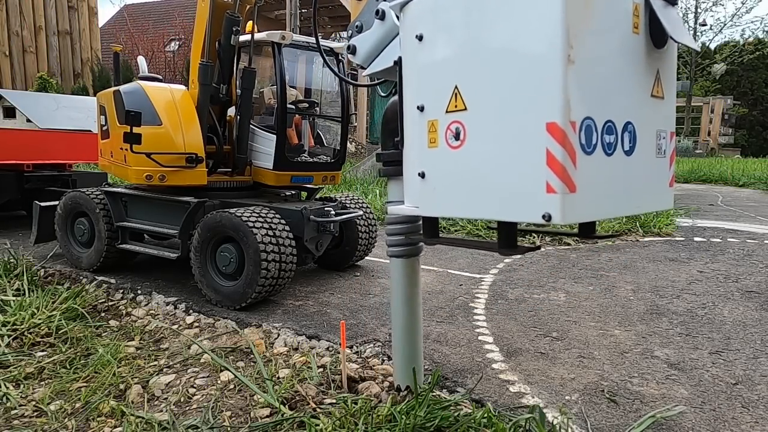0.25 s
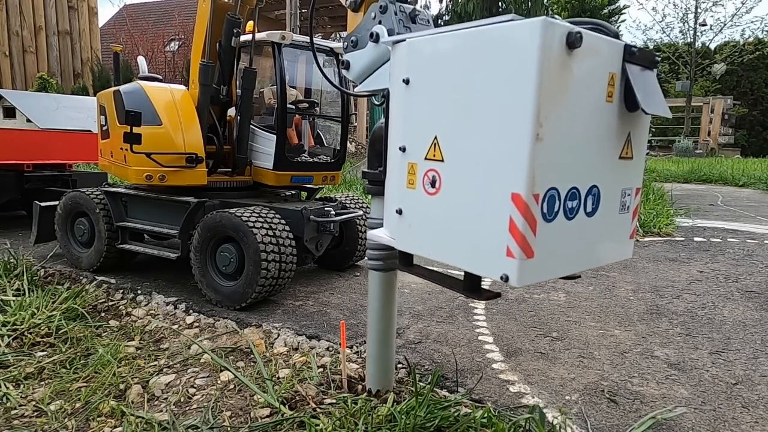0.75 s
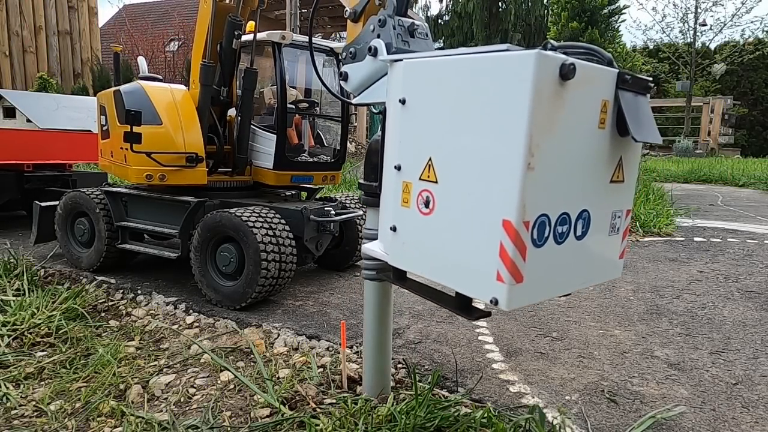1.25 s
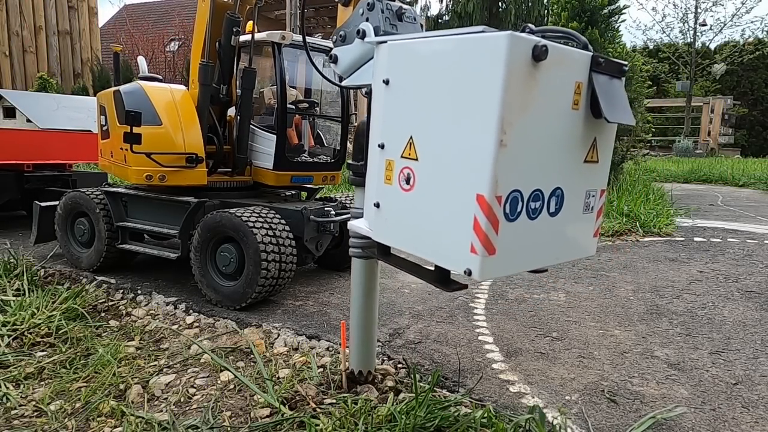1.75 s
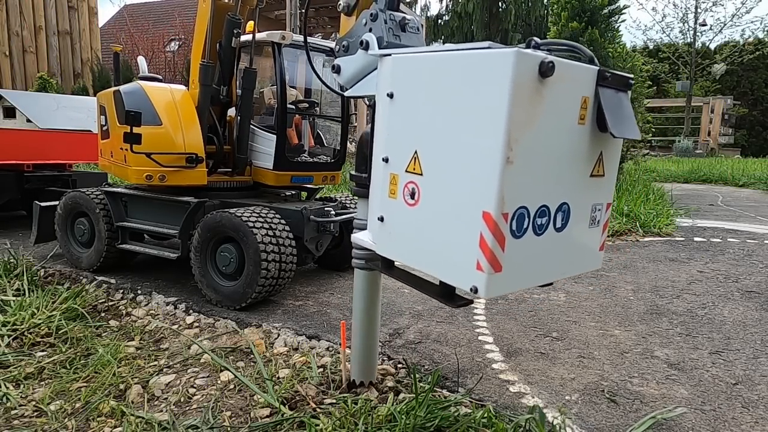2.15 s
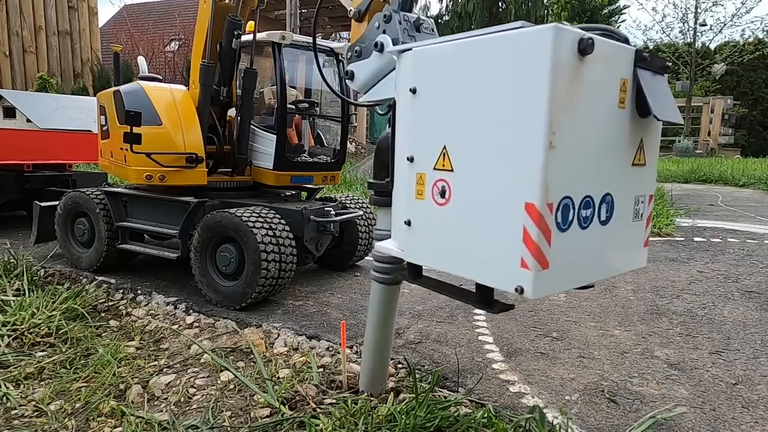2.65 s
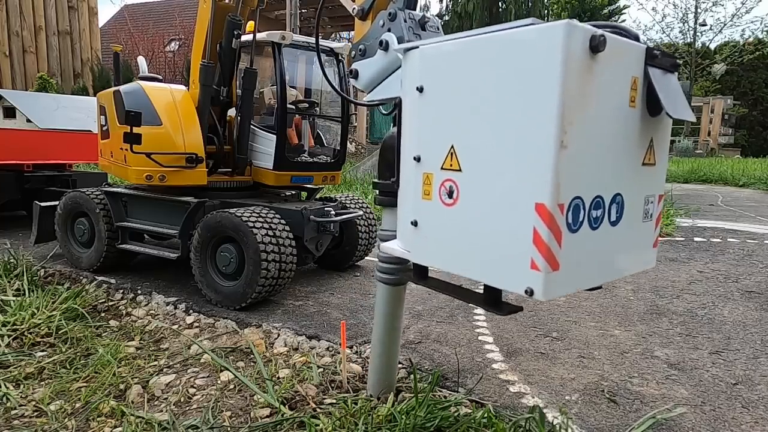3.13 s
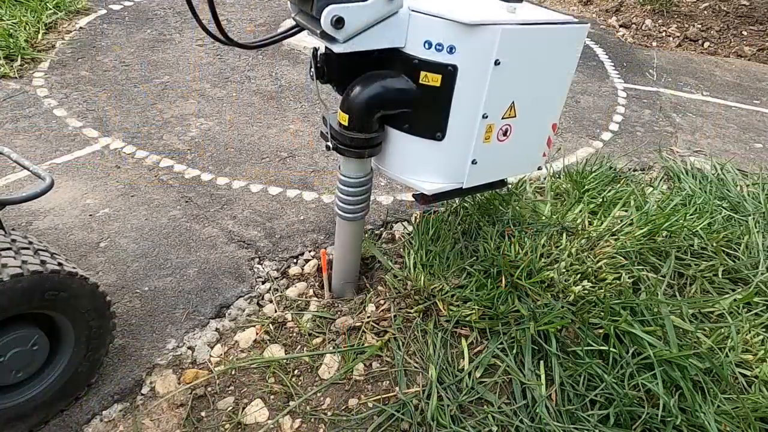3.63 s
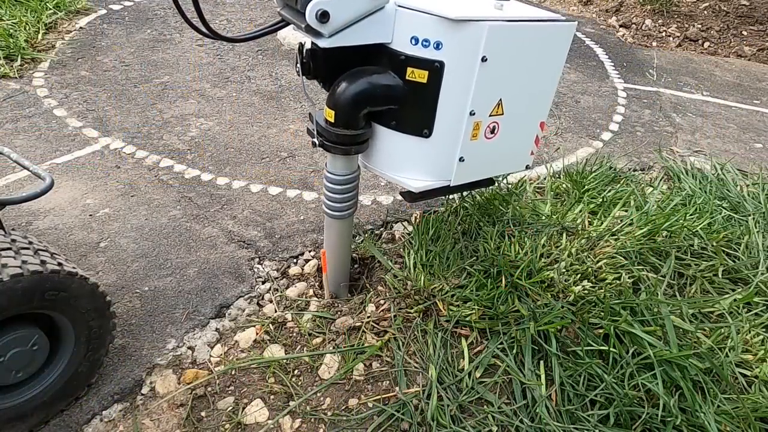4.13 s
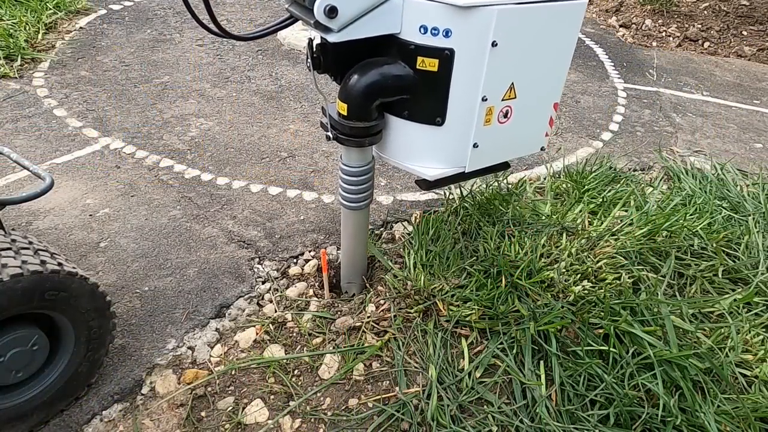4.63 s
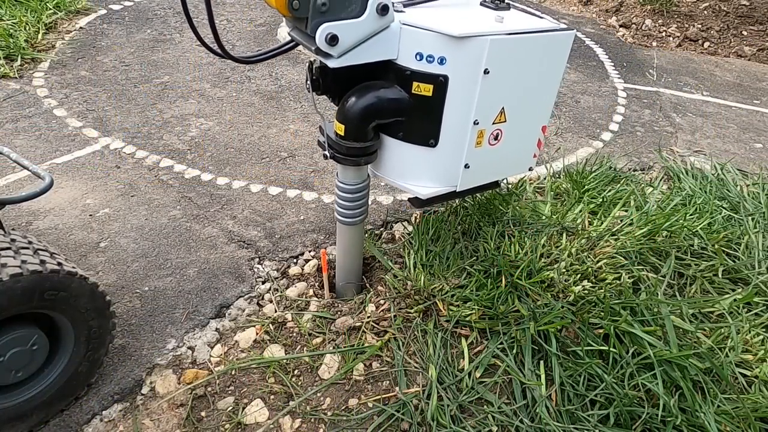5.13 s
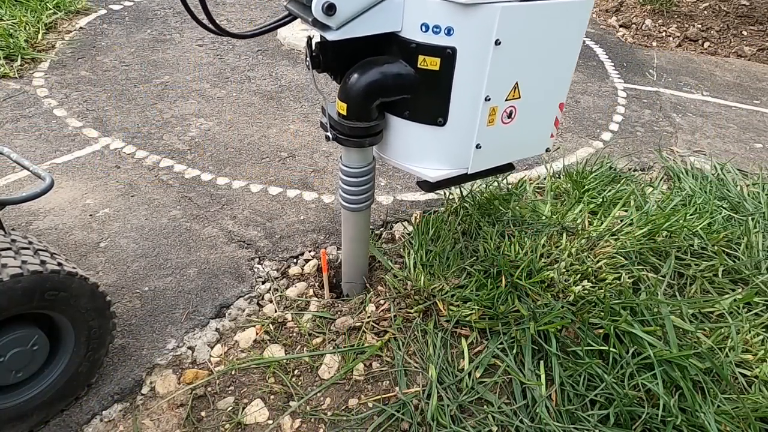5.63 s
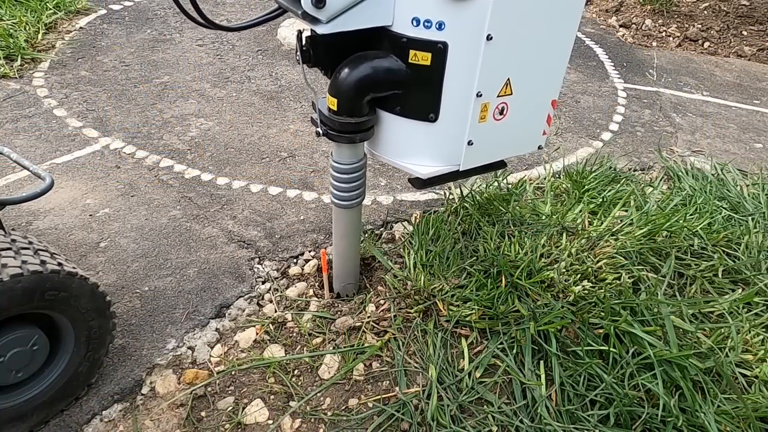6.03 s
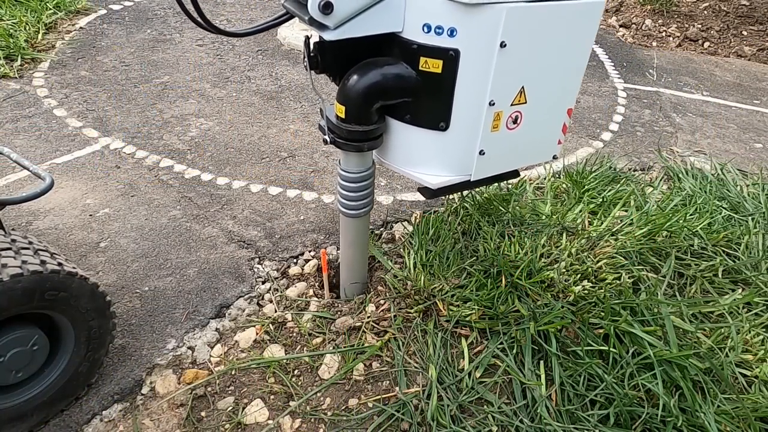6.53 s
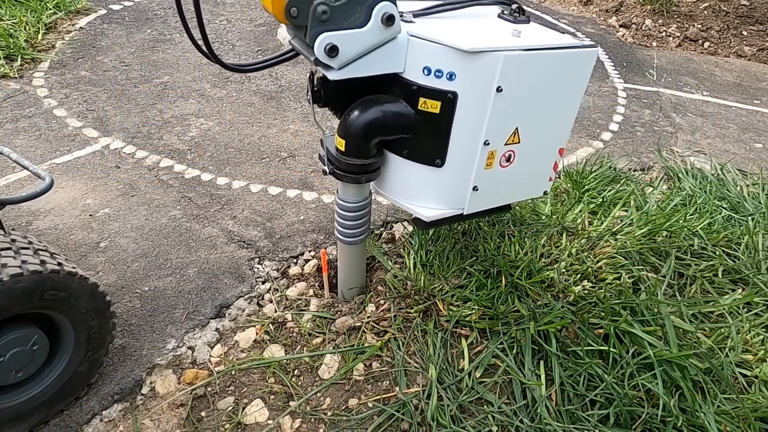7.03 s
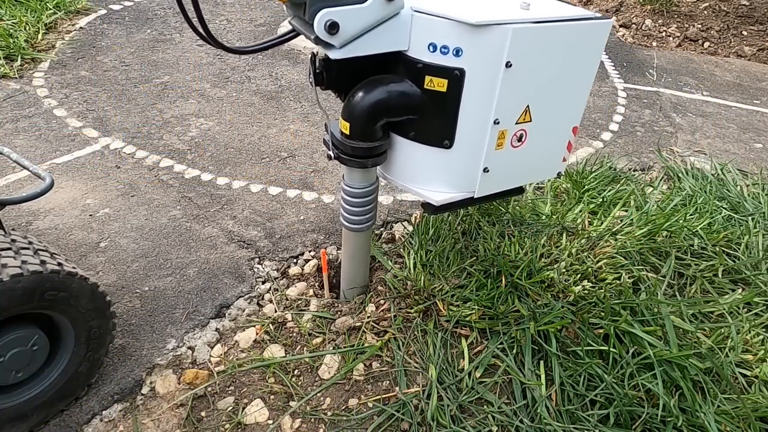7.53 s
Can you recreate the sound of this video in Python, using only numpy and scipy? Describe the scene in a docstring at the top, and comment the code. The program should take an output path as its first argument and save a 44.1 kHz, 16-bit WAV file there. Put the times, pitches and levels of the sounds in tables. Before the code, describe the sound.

Outdoors, an excavator's vacuum attachment sucks up soil with a continuous fan whirr, hissing air and a hydraulic hum, heard at first slightly from the right with a faint deep throb. After a few small knocks and a ping, the microphone position shifts to near the pipe. Low wind gusts rumble on it, grass rustles, and scattered stone clicks build to gravel rattling up the pipe.

```python
"""A suction unit on an excavator arm, outdoors, from two spots. First, facing the outlet: a hydraulic
pump hums, the fan whirrs at a hunting speed, air roars in the steel box and hisses in the duct, gritty
with soil. A deep throb swells near 1 s. Short thuds sound from 1.4 s; pebbles tick up the pipe from
3.2 s; one high ping at 3.3 s. Near 3.5 s a cross-fade leads to the second spot, by the pipe, where wind
buffets the microphone. Grass rustles at 5-6 s; gravel runs up the pipe from 7.1 s."""
import sys
import numpy as np
from scipy import signal
from scipy.fft import rfft, irfft, next_fast_len
from scipy.io import wavfile
from scipy.ndimage import uniform_filter1d, map_coordinates

SR = 44100
rng = np.random.default_rng(int(sys.argv[2]) if len(sys.argv) > 2 else 0)


def master_out(mix):
    """Clip the mix to full scale and print it as 16-bit PCM to the path in sys.argv[1]."""
    frames = np.transpose(np.atleast_2d(mix))
    ceiling = np.clip(frames, -1, 1)
    pcm = np.round(ceiling * 32767).astype(np.int16)
    wavfile.write(sys.argv[1], SR, pcm)


N = 342639
FRONT, REAR = 0, 1  # first spot, second spot
CROSSFADE_S = (3.434, 3.675)
FIZZ_SPLIT_HZ, TOP_HZ = 4060, 15600

# Each row: time in seconds, drone (fan and box), hiss and fizz levels in dB, arm swing as a pose number.
FRONT_MIX = [(0, -39, -30.5, -38, 0.8), (.5, -37.5, -30.5, -37.5, 1), (.8, -38, -29.5, -38.5, 0.1),
             (2.3, -37.5, -28.6, -39, 0), (2.6, -38, -29.5, -39, 0), (3.0, -37.5, -29, -38, 0.5),
             (3.7, -38, -28.5, -38.5, 0)]
REAR_MIX = [(3.4, -35, -36, -56, 0), (3.9, -35, -35.5, -53.5, 0), (4.2, -35, -34.5, -55, 0.1),
            (4.5, -34, -36, -55, 0.85), (4.9, -36, -38, -55, 1.5), (5.1, -35, -34, -55.5, -0.5),
            (5.3, -35.5, -36, -57.5, -1.5), (5.5, -35, -35.5, -59, 0), (5.65, -34.5, -35, -56.5, 0.5),
            (5.8, -35, -38, -54, 2), (6.2, -35, -37.5, -54.5, 1.7), (6.75, -34, -38, -52.5, 2.1),
            (6.95, -35, -37, -54.5, 1.3), (7.1, -36.5, -35.5, -54, 0.13), (7.22, -33, -32.5, -49, 0.16),
            (7.38, -32.5, -32.5, -50.5, 0), (7.55, -32, -32, -52, -0.5), (7.77, -32.5, -35, -49, 2.3)]
# Each row: time in seconds, piston rate in Hz.
FRONT_PUMP_HZ = [(0, 422), (.6, 422.8), (.85, 422.3), (1.35, 424.2), (1.65, 423.3), (2.05, 423.2),
                 (2.7, 424.9), (2.95, 424.2), (3.25, 420.3), (3.6, 420.2)]
REAR_PUMP_HZ = [(3.5, 427), (3.95, 423.8), (4.35, 423.3), (5.0, 424.2), (5.35, 428), (5.5, 428.2),
                (5.8, 423.8), (6.5, 423.2), (6.95, 423.9), (7.35, 429.2), (7.5, 429.1), (7.7, 427.3)]
# Each row: time in seconds, main whirr pitch in Hz.
FRONT_FAN_HZ = [(0, 475.2), (.2, 472.5), (.37, 476.5), (.58, 471.8), (.8, 483.2), (1.0, 476), (1.4, 481),
                (1.6, 474.2), (1.8, 475), (2.0, 482.8), (2.15, 477), (2.42, 470.4), (2.6, 471.6),
                (2.78, 477.8), (3.2, 479.8), (3.4, 479), (3.52, 475.5), (3.7, 476)]
REAR_FAN_HZ = [ (3.45, 476.4), (3.95, 473.4), (4.15, 473.8), (4.35, 478.6), (4.55, 475.2), (4.97, 482.4),
               (5.15, 483.6), (5.33, 480.4), (5.46, 484), (5.6, 473.4), (5.75, 478.2), (6.15, 479.6),
               (6.32, 485.2), (6.56, 474), (6.85, 479.2), (7.05, 479), (7.15, 482.8), (7.45, 481.6),
               (7.68, 470.4), (7.75, 469.2)]
# Each entry: a tone as a multiple of the piston rate (nine pistons a turn) or of the main whirr.
PUMP_RATIOS = np.array([9, 18, 19, 27, 35, 36, 37, 38, 54, 58, 90]) / 9
FAN_RATIOS = np.r_[np.array([23, 24, 27, 28, 29, 30, 32, 36, 54, 55, 56, 80, 87, 97]) / 28, np.array([4, 6, 7, 9]) / 5]
# Each row, one per tone: front level in dB, rear level in dB. Fan levels are relative to the drone.
PUMP_TONES_DB = [(-38.5, -37.5), (-67, -68), (-55.5, -65), (-55, -58.5), (-67, -62), (-56.5, -49.5),
                 (-53, -48), (-66, -55.5), (-62, -55), (-69, -66), (-48, -67)]
FAN_TONES_DB = [(-23, -19), (-19, -23), (-6, -4.5), (-4, -2.5), (-12.5, -13), (-10.5, -19.5), (-13, -13),
                (-15.5, -17.5), (-42, -32), (-23, -27), (-22.5, -43), (-34, -26), (-31, -31), (-21, -17),
                (-12.5, -9), (-13, -13), (-17, -42), (-29, -30)]
# Each row: centre in Hz, width in Hz, front level in dB, rear level in dB.
BOX_MODES = [(380, 70, -4, -4), (458, 110, -17, -2), (578, 85, 4.5, -8.5), (659, 66, -0.5, -19),
             (923, 140, -13, -21.5)]
DUCT_MODES = [(1346, 160, -23, -14), (1543, 220, -11.5, -8), (1653, 92, -11.5, -4.5), (2210, 220, -11, -27),
              (2487, 320, -3.5, -28), (2688, 310, 0, -14.5), (3087, 360, -3, -11), (3503, 320, -6, -6),
              (5030, 400, -12.5, -33), (5557, 310, -5, -28.5), (6210, 410, -20, -29),
              (6724, 200, -18.5, -20.5), (7600, 760, -20.5, -34), (8170, 730, -22.5, -30.5),
              (8900, 400, -37, -38), (9970, 450, -33, -33), (10600, 500, -35, -35), (13100, 1500, -44, -44)]
# Broad noise under the modes. Each row: frequency in Hz, front level in dB, rear level in dB.
BOX_FLOOR = [(20, -24, -35.5), (60, -15, -21), (150, -7, -20.5), (303, -2, -22), (520, -2.5, -1.5),
             (650, -11, -15), (696, -5, -20), (850, -8.5, -20), (1174, -8, -21.5), (1520, -32, -38),
             (3000, -75, -86.5)]
DUCT_FLOOR = [(700, -44, -66), (1210, -22, -29), (1820, -14.5, -15), (3640, -2.5, -16.5),
              (3850, -12, -22.5), (4720, -22, -21), (6400, -30, -25), (9450, -35.5, -34),
              (11700, -42.5, -43.5), (14100, -52, -62), (14400, -64, -71), (16000, -75, -72)]
# Duct colour as the arm swings. Each row: frequency in Hz, gain in dB at pose 1 and (rear only) pose 2.
FRONT_SWING_EQ = [(1000, -2), (1700, 4), (2200, 1.5), (3100, -2.5), (3550, -1.5), (4300, 2.5), (5000, 5),
                  (5550, -2), (6100, -11), (6450, -4), (6800, 6), (7150, 5.5), (7550, 2.5), (8100, -1.5),
                  (8500, -4.5), (8900, 6.5), (9300, -1), (9800, 6), (10400, -1), (11200, -3.5), (12500, -1)]
REAR_SWING_EQ = [(1000, -5.5, 3.5), (1700, 0.5, 2), (2210, -1.5, 2.5), (2740, 3, 8), (3130, 4.5, 1),
                 (3350, -0.5, -2), (3660, -3, -7.5), (4260, -2, 2), (4700, 3, -1), (5000, 1, 3.5),
                 (5270, -1, 0), (5440, 4, 3), (5545, 9, 10.5), (5660, 3, 3), (5830, 1, -2), (6100, 2, -3),
                 (6450, -3.5, -8), (6800, -5, -5), (7150, -4.5, -2), (7550, -5, 3), (8200, 3, 5.5),
                 (8500, 1, -3), (8900, 6, 0), (9300, -1, -5), (9800, -1.5, 0), (10400, -4, 0.5),
                 (11200, 3, -2), (12500, 2, 2)]
# Each row: frequency in Hz, left-right correlation.
FRONT_COHERENCE = [(100, 0.9), (500, 1), (1700, .9), (2400, 1), (3800, 0.96), (4500, 0.91), (5200, 0.89),
                   (5900, 0.74), (7200, 0.84), (8000, .91), (9300, 0.55), (10000, .8), (11000, .25)]
REAR_COHERENCE = [(100, 1), (3800, 1), (4500, .97), (6500, .95), (9000, .94), (10500, .98), (12000, .7),
                  (14000, .7)]
# Each row: frequency in Hz, left minus right level in dB.
FRONT_BALANCE_DB = [(60, 2.5), (110, -1.5), (200, 1), (380, -3.5), (700, 0.5), (1290, -0.5), (2380, -2.0),
                    (4400, -2.0), (6400, -3.5), (8120, -5), (10000, -9), (11400, -13), (15000, -11)]
# Each row: frequency in Hz, left phase lead in radians.
FRONT_LEAD_RAD = [(300, 0.07), (1380, -0.5), (3100, -1.02), (3790, -1.23), (5430, -1.71), (5900, -1.4),
                  (6400, -.05), (15000, -.05)]
# Each row: time in seconds, level in dB.
THROB_DB = [(0, -70), (.9, -61), (1.04, -49), (1.16, -64), (1.3, -54), (2.3, -53.5), (2.7, -62),
            (3.05, -58), (3.2, -68), (3.6, -72)]
RUSTLE_DB = [(4.75, -77), (5.05, -48), (5.3, -41.5), (5.55, -42), (5.65, -47.5), (6.0, -65), (6.2, -110)]
# Each row: start in seconds, level in dB, pitch in Hz.
THUDS_AND_PING = [(1.398, -26, 880), (3.203, -21, 1200), (3.2663, -9.5, 543), (3.2965, -9, 2710),
                  (4.02, -28, 900)]
# Each row: start in seconds, knock level in dB, crack level in dB, pitch factor on the pipe modes.
PEBBLE_HITS = [(3.2072, -16, -38, 1.21), (3.8064, -36, -46, 1.1), (3.8628, -33, -42, 1.1),
               (3.9281, -29, -42, 1.1), (3.9361, -22, -42, 1.1), (4.0153, -24, -50, .9),
               (5.2915, -28, -43, 1.1), (5.3563, -34, -46, 1.1), (5.382, -26, -46, 1.1),
               (5.7703, -25, -46, 1.1), (5.831, -26, -52, 1.1), (7.1259, -31, -41, 1.1),
               (7.1498, -31, -35, 1.1), (7.1968, -22, -50, 1.1), (7.2056, -18.5, -30, 1.25),
               (7.228, -25, -44, 1.2), (7.2497, -27, -36, 1.1), (7.3148, -24, -49, 1.25),
               (7.4075, -33, -42, 1.1), (7.5568, -19, -24, .95), (7.601, -32, -46, 1.1),
               (7.6261, -21, -25.5, .95), (7.632, -41, -40, 1.1), (7.6786, -22, -48, 1.25),
               (7.7139, -22, -48, .95), (7.7301, -9, -54, .94), (7.7425, -29, -43, 1.1),
               (7.7505, -25, -50, 1.15), (7.757, -24, -52, .9)]
# Each row: frequency in Hz, level in dB.
PIPE_MODES = [(2700, -10), (3400, -0.5), (4150, -4), (4850, -6), (5700, -15)]
BUFFET_SPECTRUM = [(12, -36), (25, -1.5), (50, -2.5), (85, -1), (130, -18), (400, -96)]
FLUTTER_SPECTRUM = [(40, -42), (80, -6), (120, 1.5), (200, -3), (280, -10.5), (400, -12), (1000, -94)]
GRASS_SPECTRUM = [(800, -16), (1500, -12), (3000, -3), (4500, -9.5), (6000, -15), (9000, -29.5),
                  (15000, -44)]
# Wind between gusts. Each row: time in seconds, buffet in dB, flutter in dB, stereo width in dB.
WIND_BED = [(3.5, -75, -66.5, -20), (3.75, -70, -52.5, -42), (4.1, -63, -47, -38), (4.5, -52, -48.5, -32),
            (4.9, -68, -57, -30), (5.05, -58, -51, -18), (5.15, -46, -58, -16), (5.55, -52, -50, -3),
            (5.8, -47, -54, -19), (6.3, -54, -53, -33), (6.6, -55.5, -57, -40), (7.2, -48, -53, -61),
            (7.77, -48, -59, -36)]
# Each row: centre in seconds, length in seconds, buffet in dB, flutter in dB.
WIND_GUSTS = [(5.118, .06, -41, -56), (5.203, 0.046, -39, -37.5), (5.314, 0.087, -38, -48),
              (5.485, 0.056, -36, -44), (5.58, 0.097, -41, -44), (5.706, .06, -38.5, -44),
              (5.906, 0.1, -39, -41), (6.008, 0.051, -44, -34), (6.1, 0.088, -37, -36.5),
              (6.202, .04, -42, -55), (6.29, 0.056, -42, -40), (6.36, 0.041, -42, -31.5),
              (6.476, 0.058, -38.5, -38), (6.657, 0.044, -42, -41.5), (6.816, 0.088, -42, -35),
              (6.918, .05, -40, -47), (7.03, 0.11, -48, -37.5), (7.134, .05, -41, -43),
              (7.205, 0.069, -35, -31), (7.255, .05, -38, -36), (7.3, .06, -43, -46),
              (7.401, 0.094, -36, -40), (7.608, .04, -45, -49), (7.71, 0.096, -49, -52)]
# One row: start and end in seconds, then knock level, crack level and level scatter in dB.
GRAVEL_RUN = (7.1, 7.77, -35, -51, 3)


def amp(db):
    """Gain from dB."""
    return np.exp(np.asarray(db) * (np.log(10) / 20))


def unit(x):
    """Scale to rms 1."""
    return x / np.sqrt(np.mean(x ** 2) + 1e-20)


def even(x, window_s):
    """Hold the running rms at 1."""
    return x / np.sqrt(np.abs(uniform_filter1d(x ** 2, round(window_s * SR))) + 1e-20)


def along(points, hz, column=1):
    """Read a column on a log frequency axis."""
    columns = np.transpose(points)
    return np.interp(np.log(hz + 1), np.log(columns[0] + 1), columns[column])


def curves(rows):
    """Per-sample curve for each column after the time."""
    times_s, *columns = np.transpose(rows)
    return [np.interp(np.arange(N) / SR, times_s, column) for column in columns]


def wobble(rate_hz):
    """Smooth random curve, held in 16-sample steps."""
    positions = np.arange(N // 16 + 1) * 16 * rate_hz / SR
    knots = rng.standard_normal(int(N * 40 / SR) + 4)
    return np.repeat(map_coordinates(knots, [positions]), 16)[:N]


def filtered(x, response):
    """Apply a complex frequency response."""
    size = next_fast_len(N + 8192)
    return irfft(rfft(x, size) * response(np.fft.rfftfreq(size, 1 / SR)), size)[..., :N]


def eq(points, column=1):
    """Response from rows of Hz and dB."""
    return lambda hz: amp(along(points, hz, column))


def resonant(floor, modes, spot):
    """Response of a broad floor plus modes, summed as powers."""
    def gain(hz):
        grid_hz = hz[::8]
        peaks = sum(amp(2 * db[spot]) / (1 + (2 * (grid_hz - centre_hz) / width_hz) ** 2) ** 2
                    for centre_hz, width_hz, *db in modes)
        return np.interp(hz, grid_hz, np.sqrt(peaks + amp(2 * along(floor, grid_hz, 1 + spot))))
    return gain


def rush(gain, coherence, patchy_db):
    """Stereo noise of rms 1, its level patchy in time and frequency."""
    def mid_side_gain(hz):
        angle = np.arccos(np.clip(along(coherence, hz), -1, 1)) / 2
        return gain(hz) * [np.cos(angle), np.sin(angle)]
    spectra = signal.stft(rng.standard_normal((2, N), dtype=np.float32), nperseg=512)[2]
    patches = uniform_filter1d(rng.standard_normal(spectra.shape[1:]), size=30, axis=0)
    patches = unit(uniform_filter1d(patches, size=5, axis=1))
    noise = signal.istft(spectra * amp(patchy_db * patches), nperseg=512)[1][:, :N]
    mid, side = filtered(noise, mid_side_gain)
    return unit(np.array([mid + side, mid - side]))


def tones(speed, ratios, levels_db, sway_db, blur_rad):
    """Swaying sines on multiples of a speed curve, from its first row to 0.15 s past its last."""
    heard = slice(round(speed[0][0] * SR), round((speed[-1][0] + .15) * SR))
    cycles = np.cumsum(curves(speed)[0][heard]) / SR
    out = np.zeros(N)
    for ratio, db in zip(ratios, levels_db):
        phase = 2 * np.pi * ratio * cycles + blur_rad * wobble(14)[heard] + rng.uniform(0, 2 * np.pi)
        out[heard] += amp(db + sway_db * wobble(7)[heard]) * np.sqrt(2) * np.sin(phase)
    return out


def pump(spot, speed):
    """Piston tones. Past a threshold speed the hum thins while the middle tones and whine grow."""
    levels_db, rate_hz = np.transpose(PUMP_TONES_DB)[spot], curves(speed)[0]
    hum = tones(speed, PUMP_RATIOS[:4], levels_db[:4], sway_db=.6, blur_rad=.08)
    middle = tones(speed, PUMP_RATIOS[4:-1], levels_db[4:-1], sway_db=.7, blur_rad=.08)
    whine = tones(speed, PUMP_RATIOS[-1:], levels_db[-1:], sway_db=1.5, blur_rad=.12)

    def strain(above_hz, db_per_hz):
        return amp(db_per_hz * np.maximum(rate_hz - above_hz, 0))
    return hum * strain(425.1, -1.5) + middle * strain(425.1, 1) + whine * strain(424.5, 2.5)


def fan(spot, speed):
    """Fan whirr; the speed hunts as the load changes."""
    return tones(speed, FAN_RATIOS, np.transpose(FAN_TONES_DB)[spot], sway_db=1.2, blur_rad=.45)


def box_roar(spot, coherence):
    """Air drives the broad modes of the steel box."""
    return amp(-3) * rush(resonant(BOX_FLOOR, BOX_MODES, spot), coherence, patchy_db=.34)


def duct_air(spot, coherence, swing, swing_eq, grit):
    """Air and fine soil in the duct, coloured by arm swing. Returns duct hiss and outlet fizz."""
    duct, grains_per_s = resonant(DUCT_FLOOR, DUCT_MODES, spot), 600
    strikes = rng.random(N) < grains_per_s / SR
    grains = strikes * amp(1.8 * rng.exponential(size=N)) * rng.choice([-1, 1], N)
    air = rush(duct, coherence, patchy_db=.72) + grit * unit(filtered(grains, duct))
    poses = [air] + [filtered(air, eq(swing_eq, k)) for k in range(1, len(swing_eq[0]))]
    swing = np.clip(swing, 0, len(poses) - 1)
    air = sum(np.clip(1 - np.abs(swing - k), 0, 1) * pose for k, pose in enumerate(poses))
    fizz = filtered(air, lambda hz: 1 / (1 + (FIZZ_SPLIT_HZ / (hz + 1)) ** 16))
    return unit(air - fizz), unit(fizz)


def suction_unit(spot, mix, pump_speed, fan_speed, coherence, swing_eq, grit):
    """Pump, fan, box and duct from one spot."""
    drone_db, hiss_db, fizz_db, swing = curves(mix)
    hum = pump(spot, pump_speed)
    drone = fan(spot, fan_speed) + box_roar(spot, coherence)
    hiss, fizz = duct_air(spot, coherence, swing, swing_eq, grit)
    return hum + amp(drone_db) * drone + amp(hiss_db) * hiss + amp(fizz_db) * fizz


def throb(pitch_hz=28):
    """Deep wavering tone, nearly the same left and right."""
    phase = 2 * np.pi * pitch_hz * np.arange(N) / SR + .7 * wobble(7)
    tone = np.sqrt(2) * np.sin(phase + np.array([[.08], [-.08]]) * wobble(20))
    return amp(curves(THROB_DB)[0] + 3 * wobble(8.25)) * tone


def strike(track, start_s, ring, db, attack_s, t60_s):
    """Add ring to track under an impact envelope."""
    at, t = round(start_s * SR), np.arange(len(ring)) / SR
    track[at:at + len(ring)] += amp(db - 60 * t / t60_s) * (1 - np.exp(-t / attack_s)) * ring


def thuds_and_ping():
    """Short thuds and one brief high ping, one damped sine each."""
    track, t = np.zeros(N + SR), np.arange(SR // 50) / SR
    for start_s, db, hz in THUDS_AND_PING:
        strike(track, start_s, np.sin(2 * np.pi * hz * t), db, attack_s=.0011, t60_s=.016)
    return track[:N]


def pebbles(hits, detune=.025, rattle=.35):
    """Each stone knocks the pipe wall (short modes in dry noise) and adds a bright crack."""
    knocks, cracks, t = np.zeros(N + SR), np.zeros(N + SR), np.arange(SR // 50) / SR
    for start_s, knock_db, crack_db, pitch in hits:
        ring = sum(amp(db) * np.sin(2 * np.pi * hz * pitch * (1 + detune * rng.standard_normal()) * t)
                   for hz, db in PIPE_MODES)
        ring += rattle * rng.standard_normal(len(t))
        strike(knocks, start_s, ring, knock_db, attack_s=.00053, t60_s=.01)
        strike(cracks, start_s, rng.standard_normal(len(t)), crack_db, attack_s=.0004, t60_s=.008)
    wall = eq([(800, -14), (2000, -16), (3500, -1), (5000, -3.5), (7000, -5), (10000, -42)])
    bright = eq([(3000, -30), (6000, -6), (8000, .5), (10400, 5), (11800, 0), (14000, -14), (15500, -35)])
    return filtered(knocks[:N], wall) + filtered(cracks[:N], bright)


def wind():
    """Low gusting wind, nearly mono, widening briefly around 5-6 s."""
    buffet_db, flutter_db, width_db = curves(WIND_BED)
    level, t = amp([buffet_db, flutter_db]), np.arange(N) / SR
    for centre_s, length_s, *gust_db in WIND_GUSTS:
        near = slice(round((centre_s - 2 * length_s) * SR), round((centre_s + 2 * length_s) * SR))
        level[:, near] += amp(gust_db)[:, None] * np.exp(-(2 * (t[near] - centre_s) / length_s) ** 2)
    lumps = amp(2.2 * wobble(25))
    noise = rng.standard_normal((2, 2, N))
    buffet = unit(lumps * even(filtered(noise[0], eq(BUFFET_SPECTRUM)), window_s=.055))
    flutter = unit(lumps * even(filtered(noise[1], eq(FLUTTER_SPECTRUM)), window_s=.037))
    mid, side = level[0] * buffet + level[1] * flutter
    return np.array([mid + amp(width_db) * side, mid - amp(width_db) * side])


def grass():
    """Grass rustles in the gusts."""
    return amp(curves(RUSTLE_DB)[0]) * rush(eq(GRASS_SPECTRUM), coherence=[(1000, .8)], patchy_db=2.5)


def gravel_hits(count=24):
    """Small stones of random time, level and pitch, as rows for pebbles()."""
    start_s, end_s, knock_db, crack_db, scatter_db = GRAVEL_RUN
    times_s = rng.uniform(start_s, end_s, count)
    offset_db = scatter_db * rng.standard_normal((count, 2))
    pitches = rng.uniform(.9, 1.3, count)
    return list(zip(times_s, knock_db + offset_db[:, 0], crack_db + offset_db[:, 1], pitches))


def scene():
    """The front spot, heard from the right, fades into the rear, heard head-on; impacts over both."""
    front = suction_unit(FRONT, FRONT_MIX, FRONT_PUMP_HZ, FRONT_FAN_HZ, FRONT_COHERENCE,
                         FRONT_SWING_EQ, grit=.15) + throb()
    half = np.array([[.5], [-.5]])
    front = filtered(front, lambda hz: amp(half * along(FRONT_BALANCE_DB, hz))
                     * np.exp(1j * half * along(FRONT_LEAD_RAD, hz)))
    rear = suction_unit(REAR, REAR_MIX, REAR_PUMP_HZ, REAR_FAN_HZ, REAR_COHERENCE,
                        REAR_SWING_EQ, grit=.36) + grass() + wind()
    fade = np.interp(np.arange(N) / SR, CROSSFADE_S, [0, 1])
    return (1 - fade) * front + fade * rear + thuds_and_ping() + pebbles(PEBBLE_HITS + gravel_hits())


def record(dry):
    """Brick-wall low-pass."""
    return filtered(dry, lambda hz: hz < TOP_HZ)


dry = scene()
out = record(dry)
master_out(out)
```